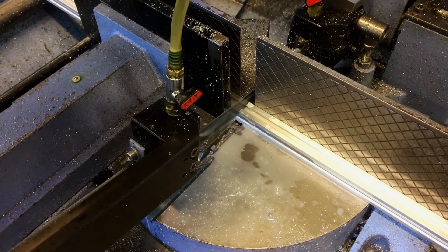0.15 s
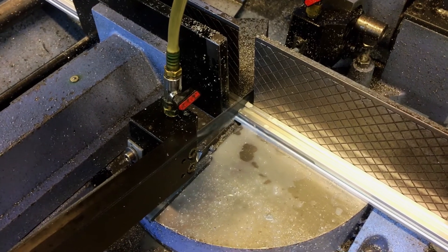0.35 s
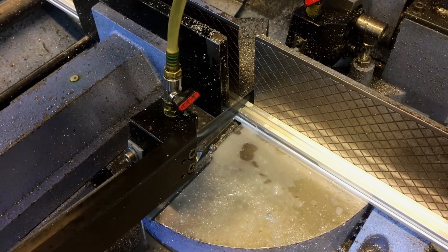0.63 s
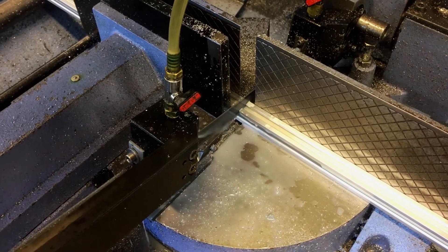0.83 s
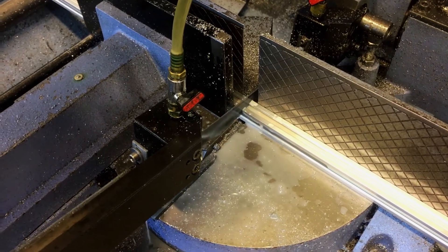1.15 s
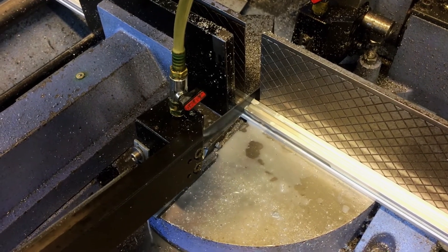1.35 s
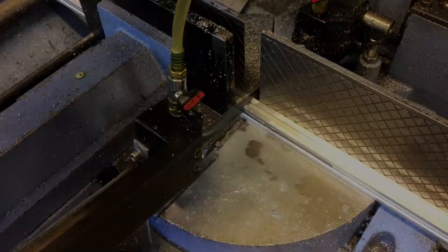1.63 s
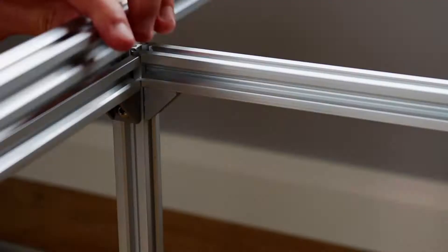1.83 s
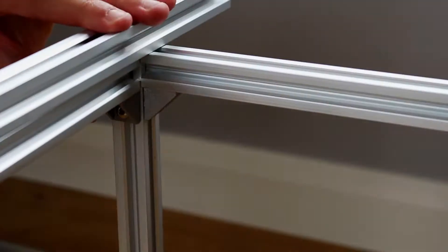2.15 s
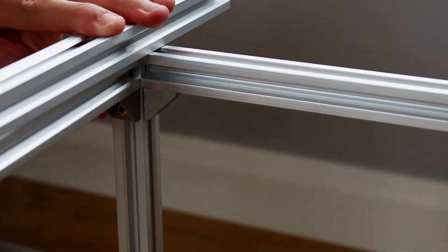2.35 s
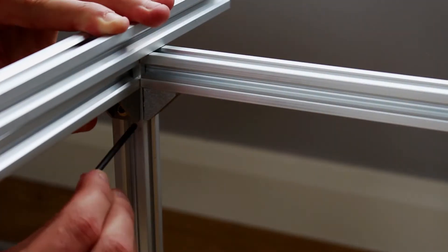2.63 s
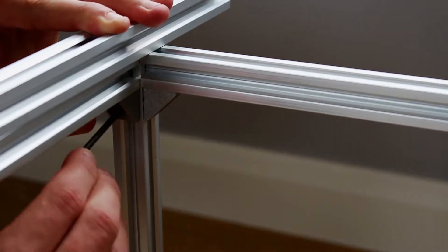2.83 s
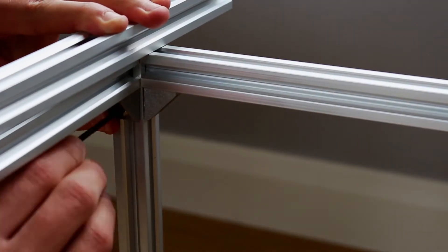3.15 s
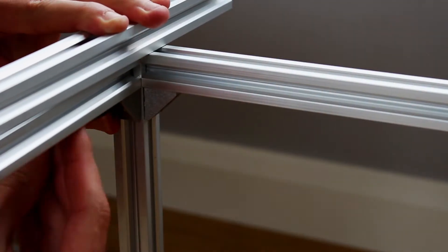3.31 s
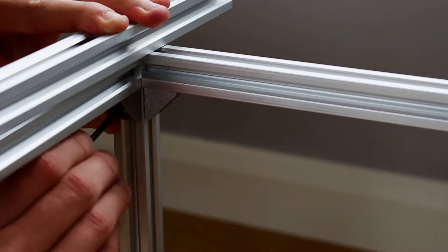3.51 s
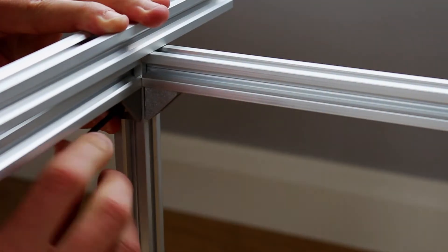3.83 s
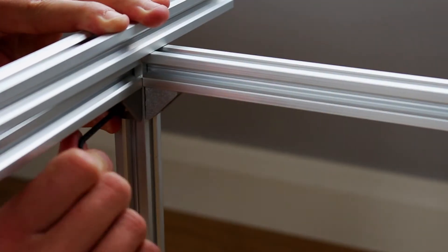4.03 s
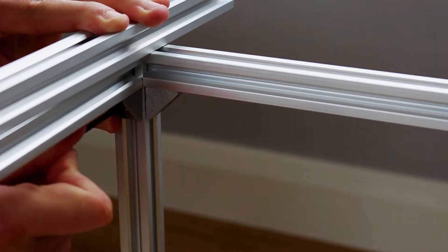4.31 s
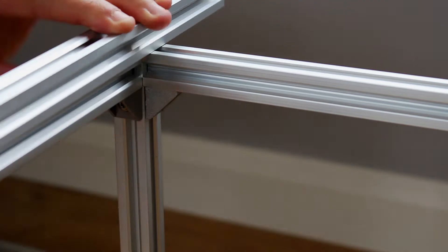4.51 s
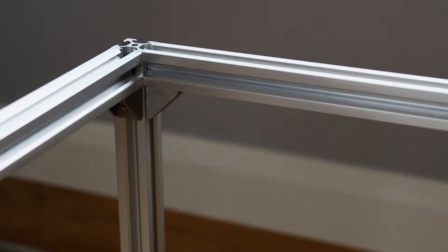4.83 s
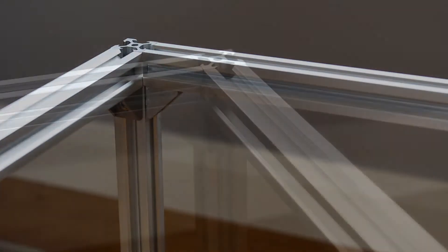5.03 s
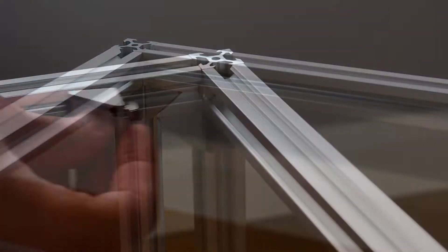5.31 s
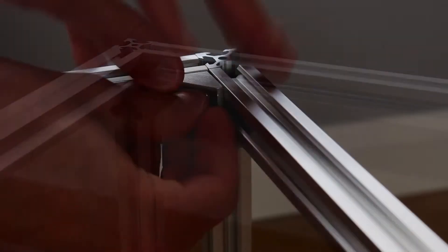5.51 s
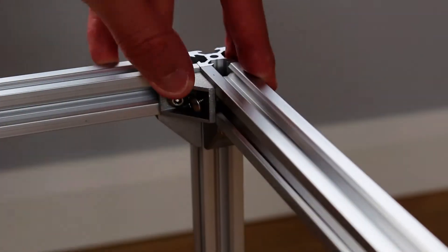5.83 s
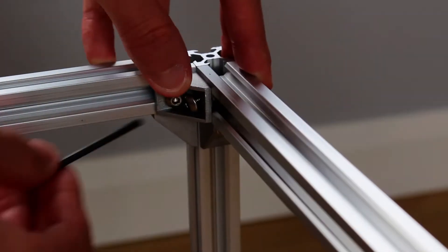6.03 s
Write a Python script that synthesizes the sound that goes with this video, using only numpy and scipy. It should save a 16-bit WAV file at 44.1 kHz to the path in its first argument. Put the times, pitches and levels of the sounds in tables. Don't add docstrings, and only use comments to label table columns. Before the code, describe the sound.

From 0 to about 1.75 seconds a circular saw cuts aluminium extrusion: a loud, dense tooth whine, strongest around 1.2 kHz, with gritty chip hiss, ringing blade, motor hum and slight fast pulsing; the bite roughens briefly near 1.45. It ends abruptly in a quiet room with faint air and low hum. At 2.0 and 2.1 bright metallic clacks seat a part on a hollow frame, with smaller taps to 2.4. From 2.7 to 3.45 a hex key gives small crisp ticks and scrapes, then near quiet until clicks at 4.35. At 4.6 a bar clatters sharply, then drags and knocks, with hard clacks at 4.8 to 5.0 and a hollow knock at 5.15. After a tiny silent gap at 5.26, brackets click, rattle and rub, with brief squeaks and dull knocks, until about 6.2. Close, dry, mono.

```python
import sys
import numpy as np
from scipy import signal
from scipy.fft import rfft, irfft
from scipy.io import wavfile
from scipy.ndimage import uniform_filter1d

SR = 44100
rng = np.random.default_rng(int(sys.argv[2]) if len(sys.argv) > 2 else 0)


def inscribe(sig):
    pcm = np.round(np.clip(np.atleast_2d(sig).T, -1, 1) * 32767)
    wavfile.write(sys.argv[1], SR, pcm.astype(np.int16))


def volts_from_decibels(level):
    exponent = np.asarray(level, float) / 20
    return 10 ** exponent


N = 272097
TIME = np.arange(N) / SR
HZ = np.fft.rfftfreq(N, 1 / SR) + 1

# f/Hz, level/dB, t60/s (same columns for the next six)
SEAT_MODES = [(2140, -4, 0.04), (3010, 5, 0.02), (3250, 8.5, 0.13), (3770, 4, 0.061), (4470, -3, 0.047),
              (5630, -6, 0.047), (6660, 1, 0.058), (6790, -1, 0.08), (7970, 0, .06), (8200, 7, 0.022),
              (8530, 1, 0.069), (9750, -3, .06), (10700, 2, 0.044), (11800, 2.5, 0.013)]
RESEAT_MODES = [(2214, -7, .04), (2690, 0, 0.013), (2930, -9, 0.045), (3250, -11, 0.03), (3820, -3, 0.036),
                (4480, -3, 0.023), (5330, -19, 0.03), (6105, -20, .07), (7860, 6, 0.017), (8220, 0, .04),
                (8600, -5, 0.05), (9600, -5, 0.046), (11120, 0, 0.012)]
KEY_MODES = [(1423, -5, 0.071), (2700, -6.5, 0.041), (3300, -11, .06), (3930, -14, 0.052),
             (4330, -16, 0.056), (4840, -22, 0.055), (6200, -15, .2), (6700, -8, 0.043), (7640, -4, 0.023),
             (8260, 3.5, 0.037), (9500, -4, .028), (11440, 2, 0.021), (13000, 0, 0.0017),
             (15700, -8, .0037)]
SLIP_MODES = [(2137, -20, .03), (3311, -11, .04), (3957, -10, .03), (4720, -14, .05), (5927, -15, .15),
              (6169, -15, .1), (7246, -7, .06), (8199, -1, .05), (9100, -2, .03), (9700, -2, .03),
              (11540, 0, .024), (13100, 2, .003)]
BAR_MODES = [(1810, -30, 0.54), (2226, 5.5, 0.024), (3260, 0, 0.045), (3680, 3.5, 0.021), (4350, -3, 0.12),
             (5968, -13, 0.26), (6770, -7, .04), (7300, -9, 0.12), (7850, 3, 0.13), (8130, 6, 0.032),
             (8850, 10, 0.0051), (9600, 3, 0.02), (11500, 1, 0.0043)]
DRAG_MODES = [(2620, 1, .02), (3090, 5, 0.013), (3500, -1, 0.074), (3790, -23, 0.033), (4300, -8, 0.059),
              (4920, -17, 0.036), (6900, -11, 0.037), (7730, -7, .03), (8400, -8, .02), (9560, -12, 0.012)]
KNOCK_MODES = [(1040, 11, 0.031), (1440, 10, 0.029), (1817, 8, 0.025), (2110, 3, 0.03), (2650, -8, 0.02),
               (3470, -6, 0.022), (4400, -10, 0.02), (8350, -3, 0.0095)]
# f/Hz, level/dB, t60/s
BRACKET_MODES = [(2200, -5, 0.0031), (2930, -9, 0.044), (3260, -16, 0.034), (3790, -12, .05),
                 (4700, -27, 0.045), (6400, -13, 0.1), (6800, -10, 0.033), (7700, -10, 0.065),
                 (8200, 4, 0.047), (9000, 5, 0.032), (9670, 7, 0.015), (10580, 1.5, 0.015),
                 (11500, -2, 0.022), (14100, 2, .001)]


def level(x, db):
    return x * volts_from_decibels(db) / np.sqrt(np.mean(x ** 2))


def curves(table):
    s, *columns = np.transpose(table)
    return [np.interp(TIME, s, c) for c in columns]


def noise(shape):
    white = rng.standard_normal(N)
    return level(irfft(rfft(white) * shape(HZ), N), 0)


def colour(table):
    hz, db = np.transpose(table)
    return lambda f: volts_from_decibels(np.interp(np.log(f), np.log(hz), db))


def peak(hz, width):
    return lambda f: 1 / (1 + (2 * (f - hz) / width) ** 2)


def band(low_hz, high_hz):
    return lambda f: 1 / np.sqrt((1 + (low_hz / f) ** 6) * (1 + (f / high_hz) ** 6))


def walk(rate):
    k = int(SR / rate)
    held = np.repeat(rng.standard_normal(N // k + 1), k)
    return 2.08 * uniform_filter1d(uniform_filter1d(held, k), k)[:N]


def resonances(table, flicker_db):
    return sum(volts_from_decibels(db + flicker_db * walk(5.3)) * noise(peak(hz, width)) for hz, width, db in table)


def room():
    # f/Hz, level/dB per Hz; then its overall level/dB
    air, air_db = [(24, -66), (40, -36), (101, -40), (127, -5), (155, -20), (194, 23), (320, -11),
                   (503, 21.5), (1210, -19), (1370, 23.5), (1680, -3), (12800, -23), (16000, 9)], -64
    # f/Hz, width/Hz, level/dB
    appliance = [(102.5, 7.7, -86), (114.7, 8.8, -80.5), (203, 7.4, -90), (251.5, 29, -75)]
    return level(noise(colour(air)), air_db) + resonances(appliance, 0.82)


def hands():
    # middle t/s, half length/s, level/dB, weight of the rubbed body/dB
    spells = [(1.814, 0.6, -61, -2), (1.912, 0.04, -72, 11), (2.496, 0.029, -63, 7),
              (2.614, 0.055, -65.5, 6.5), (2.993, 0.2, -71, 8.5), (4.655, 0.11, -53.5, -6.5),
              (4.948, 0.085, -42.5, -11), (5.157, 0.13, -52.5, 1), (5.408, 0.046, -56, -23),
              (5.617, 0.15, -58, 0), (5.864, 0.064, -52, -1), (6.012, 0.04, -62, 5.5),
              (6.17, 0.085, -51.5, -4)]
    # start t/s, length/s, level/dB
    squeaks = [(5.104, 0.13, -53.5), (5.278, .02, -48), (5.804, 0.079, -53), (5.98, .06, -57)]
    rest_db, squeak_edge_s = -61, 0.014
    skin = body = squeak = 0
    for s, half_s, db, weight_db in spells:
        stroke = volts_from_decibels(db) * np.exp(-((TIME - s) / half_s) ** 2)
        skin = skin + stroke
        body = body + stroke * volts_from_decibels(weight_db)
    for s, length_s, db in squeaks:
        inside_s = np.minimum(TIME - s, s + length_s - TIME)
        squeak = squeak + volts_from_decibels(db) * np.clip(inside_s / squeak_edge_s + .5, 0, 1) ** 2

    low = np.hypot(volts_from_decibels(rest_db + 0.6 + .9 * walk(27.12)), body * volts_from_decibels(-3.5 + 2.8 * walk(27)))
    middle = np.hypot(volts_from_decibels(rest_db - 1.5), body * volts_from_decibels(3.1 * walk(44)))
    treble = np.hypot(volts_from_decibels(rest_db + 1.2), skin * volts_from_decibels(3.8 * walk(45)))
    friction = low * noise(band(505.0, 1110.0))
    friction += middle * noise(band(1870.0, 2270.0))
    friction += treble * noise(band(3000.0, 12100.0))
    return friction + squeak * volts_from_decibels(2.2 * walk(60)) * noise(peak(7600, 450))


def thuds():
    # t/s, peak level/dB, f/Hz
    blows = [(4.628, -46, 244), (5.505, -44, 246), (5.561, -46, 239), (5.882, -47, 304), (1.899, -64, 104),
             (3.648, -65.5, 91.5), (4.599, -71, 147), (4.787, -54, 116), (4.79, -51, 237),
             (5.885, -58, 141), (5.021, -48, 118), (5.152, -51, 114), (2.117, -32, 534), (5.147, -26, 734),
             (5.661, -37, 620), (5.734, -39, 638), (5.788, -38.5, 607), (5.85, -36.5, 598),
             (5.931, -38, 596)]
    out = 0
    for s, peak_db, hz in blows:
        t = np.maximum(TIME - s, 0)
        fade_s = 0.0045 + 2.3 / hz
        swell = np.tanh(t / fade_s * 4.0)
        out = out + volts_from_decibels(peak_db) * swell * np.exp(-t / fade_s) * np.sin(2 * np.pi * hz * t)
    return out


def rings():
    # t/s, peak level/dB, f/Hz, t60/s
    tails = [(1.99, -33, 3780, .08), (1.992, -31, 3300, .14), (1.979, -33, 5700, .07),
             (2.106, -35, 4460, .05), (2.157, -46, 3300, .06), (2.319, -36, 2648, .04),
             (2.953, -47, 1442, .06), (2.998, -56, 5937, .3), (3.042, -44, 4440, .06),
             (4.645, -49, 1816, .7), (4.61, -30, 4460, .13), (4.63, -33, 5960, .34), (4.89, -36, 1534, .05),
             (4.956, -35, 581, .1), (4.995, -43, 565, .12), (5.02, -52, 560, 1.3), (5.056, -28, 7975, .06),
             (5.119, -39, 1055, .04), (5.145, -34, 554, .09), (5.329, -47, 3388, .05),
             (5.33, -59, 2140, .6), (5.451, -32, 4777, .06), (5.486, -47, 2400, .08),
             (5.658, -47, 5081, .055), (5.659, -37, 1464, .05), (5.734, -42, 1450, .04),
             (5.888, -40, 2750, .05), (6.1, -54, 2000, .25), (4.625, -34, 7800, .2), (4.63, -36, 7300, .13),
             (2.843, -46, 1300, .05), (3.437, -45, 1300, .05), (2.108, -33, 7800, .09),
             (1.979, -32, 4470, .08), (4.611, -30, 2900, .04)]
    waver_db, waver_rad, waver_per_s = 2, .45, 60
    out = 0
    for s, peak_db, hz, t60 in tails:
        t = np.maximum(TIME - s, 0)
        fade_db = peak_db - 60 * t / t60 + waver_db * walk(waver_per_s)
        tone = np.sin(2 * np.pi * hz * t + waver_rad * walk(waver_per_s))
        out = out + volts_from_decibels(fade_db) * np.tanh(t / 0.0029) * tone
    return out


def ticks():
    # t/s, peak level/dB, f/Hz
    impacts = [(1.9916, -13, 8200), (4.7622, -20, 4200), (4.8225, -12, 6500), (4.8304, -14, 5000),
               (4.8682, -21, 4000), (4.9211, -13, 2400), (4.9218, -6, 2000), (4.924, -13, 1700),
               (4.9585, -13, 4000), (5.0, -18, 2400), (5.0504, -31, 2200), (5.0596, -20, 5000),
               (5.4439, -24, 8700), (5.4512, -18, 8300), (5.5941, -19, 8400), (5.8903, -22, 6000)]
    out = 0
    for s, peak_db, hz in impacts:
        cycles = (TIME - s) * hz
        out = out + volts_from_decibels(peak_db) * np.exp(-(cycles / .65) ** 2) * np.sin(2 * np.pi * cycles)
    return out


def contacts(events, swell):
    # until t/s, its modes, ring over rattle/dB
    handled = [(2.09, SEAT_MODES, 5), (2.68, RESEAT_MODES, 7), (3.19, KEY_MODES, 4), (3.35, SLIP_MODES, 2),
               (4.5, SLIP_MODES, 1), (4.7, BAR_MODES, 5.5), (4.9, DRAG_MODES, -2), (5.27, KNOCK_MODES, 1),
               (5.56, BRACKET_MODES, 8), (5.8, BRACKET_MODES, 6), (5.95, BRACKET_MODES, 2),
               (6.2, BRACKET_MODES, 8)]
    crispness = [5, 5.5, 3.5, -0.5, 9.5, 4.5, 7.5, 1.5, 2, 10, 15.5, 2]
    # f/Hz, level/dB, t60/s
    hollow = [(534, 7, 0.051), (654, 7, 0.046), (935, 0, 0.04)]
    size = 2 ** 14
    t = np.arange(size) / SR
    f = np.fft.rfftfreq(size, 1 / SR) + 1
    parts = [band(5000., 18000.)(f), band(1600., 4800.)(f), band(430., 1150.)(f)]
    out = np.zeros(N + size)
    for s, peak_db, middle_db, low_db, length_s in events:
        modes, ring_db, crisp_db = next((*step[1:], db) for step, db in zip(handled, crispness) if s < step[0])
        hz, db, t60 = np.transpose(modes + hollow)[:, :, None]

        grip = rng.standard_normal((2, len(hz), 1))
        shifted_hz = hz * (1 + .001 * grip[0] / np.sqrt(t60))
        pole = np.exp(2j * np.pi * shifted_hz / SR - np.log(1000) / (np.clip(t60, .002, .4) * SR))
        favour = volts_from_decibels(db + 1.6 * grip[1]) * np.sqrt(1 - abs(pole))
        ring = np.sum(favour / (1 - pole * np.exp(-2j * np.pi * f / SR)), axis=0)

        lead_s = 2 * length_s * swell
        side_s = np.where(t < lead_s, 0.69 * length_s, length_s)
        shape = np.minimum(t / 0.00079, 1) * np.exp(-(abs(t - lead_s) / side_s) ** 1.56)
        shape *= 1 + (1 - swell) * np.exp(-t / 0.0013)
        chance = rng.standard_normal((2, size))
        rattle = rfft(shape * chance[0] * volts_from_decibels(0.31 * chance[1]))
        rattle = rattle * volts_from_decibels(crisp_db / (1 + (11500 / f) ** 12))

        for part, gain_db, extra_db in zip(parts, (-9.0, middle_db, low_db), (0, 1.5, 2.5)):
            ring_rms = np.sqrt(np.mean(abs(part * ring) ** 2) / np.mean(part ** 2))
            body = part * (1 + volts_from_decibels(ring_db + extra_db) * ring / ring_rms)
            sound = irfft(rattle * body, size)
            loudest = np.sqrt(uniform_filter1d(sound ** 2, size=256).max())
            out[int((s - lead_s) * SR):][:size] += volts_from_decibels(peak_db + gain_db) * sound / loudest
    return out[:N]


def handling():
    # t/s, peak level/dB, weight of the body under the tick/dB, length/s
    seating = [(1.977, -13.5, -15.5, 0.019), (1.9901, -11, -14.5, 0.02), (2.1052, -15, -17, 0.017),
               (2.158, -35.5, -19, 0.017), (2.215, -46.5, -7, 0.013), (2.285, -43.5, -7, 0.023),
               (2.32, -33, -9, 0.011)]
    key_turns = [(2.71, -41, -32, .014), (2.732, -30.5, -34, 0.016), (2.793, -24.5, -51, 0.034),
                 (2.81, -32.5, -19, 0.058), (2.902, -28.5, -32, 0.013), (2.9122, -21, -21, 0.014),
                 (2.998, -28.5, -27, 0.015), (3.0328, -45.5, -5, 0.012), (3.057, -50, -2.5, 0.035),
                 (3.1415, -24, -25, 0.014), (3.2086, -36, -14, 0.016), (3.2218, -17.5, -17, 0.017),
                 (3.2521, -31.5, -12, 0.025), (3.435, -34.5, -11, 0.019), (3.642, -67, 14.5, 0.03),
                 (4.3635, -30, -23, 0.0056), (4.446, -39.5, -14, 0.02)]
    bar_clatter = [(4.5454, -19.5, -11.5, 0.023), (4.576, -31.5, -5, 0.013), (4.59, -18.5, -10, 0.013),
                   (4.717, -36, -16, 0.01), (4.7615, -17, -18, 0.014), (4.821, -13.5, -21.5, 0.049),
                   (4.8435, -23, -19, 0.026), (4.8674, -16.5, -18, 0.013), (4.9209, -21, -2, 0.015),
                   (4.9284, -28.5, 6, 0.032), (4.955, -12.5, -18, 0.011), (5.001, -37, -1.5, 0.019),
                   (5.047, -34.5, -6, 0.025), (5.06, -23.5, -18.5, 0.012), (5.116, -35, -23, 0.018),
                   (5.232, -44, -12, 0.047)]
    bracket_fit = [(5.308, -40, -34, .025), (5.3193, -27, -29, 0.024), (5.354, -36.5, -18, 0.033),
                   (5.3757, -37.5, -34, 0.059), (5.44, -23, -43, .013), (5.45, -17, -30, 0.014),
                   (5.4967, -28, -14, 0.015), (5.5144, -29.5, -41, .022), (5.5839, -28.5, -15.5, 0.027),
                   (5.592, -19.5, -27, 0.016), (5.66, -36.5, -1.5, 0.011), (6.049, -37, -32, .019),
                   (6.136, -34, -33, .018)]
    # t/s, peak level/dB, weight/dB
    slides = [(1.8844, -46, -14), (2.0295, -29.5, -7.5), (2.343, -38.5, -11), (2.8467, -41, -3),
              (3.404, -41.5, -11), (4.6099, -7, -17.5), (4.6359, -18, -18.5), (4.791, -33, -15),
              (4.8903, -43, -1), (5.1494, -37.5, -9), (5.395, -36, -26), (5.4873, -41.5, -4),
              (5.5344, -39, -32), (5.5674, -41, -36), (5.864, -26, -35), (5.8886, -19.5, -17),
              (5.9074, -27, -17), (6.158, -29, -31), (4.914, -36, -6)]
    # t/s, peak level/dB
    knuckles = [(1.9785, -46), (2.1169, -42), (2.276, -46.5), (2.331, -42.5), (2.385, -50.5), (2.945, -54),
                (3.1406, -49), (3.222, -43), (3.4351, -49), (3.643, -58), (4.335, -51.5), (4.9551, -40),
                (4.997, -42.5), (5.116, -50), (5.134, -41), (5.283, -51.5), (5.4974, -42), (5.555, -49),
                (5.659, -35.5), (5.723, -55), (5.735, -38.5), (6.0497, -49), (2.845, -53), (3.398, -56),
                (5.59, -50)]
    hollow_db, knock_tick_db = -28, -21
    sharp = [(s, db, weight_db, weight_db + hollow_db, length_s)
             for s, db, weight_db, length_s in seating + key_turns + bar_clatter + bracket_fit]
    swells = [(s, db, weight_db, weight_db + hollow_db, 0.013) for s, db, weight_db in slides]
    knocks = [(s, db + knock_tick_db, 5, -knock_tick_db, 0.016) for s, db in knuckles]
    return contacts(sharp, 0) + contacts(swells, 0.88) + contacts(knocks, 0)


def blade_turn():
    sag_hz = 6.5 * (1 - np.tanh((TIME - .062) / .008)) / 2
    return 2 * np.pi * np.cumsum(413.9 - sag_hz) / SR


def rim_runout():
    first_dip_s, depth_db, share_of_turn = 0.0923, -3.5, 0.046
    rim = ((TIME - first_dip_s) * 413.9 / 48 + .5) % 1 - .5
    return depth_db * np.exp(-(rim / share_of_turn) ** 2) * (1 + 0.3 * walk(10.9))


def tooth_whine(turn, runout_db, feed_db, orders_db):
    # t/s, level/dB
    grip = [(0.0, -15.5), (0.066, -23), (0.16, -21), (0.29, -26), (0.42, -20), (0.72, -24.5), (0.82, -24),
            (0.87, -37.5), (0.973, -21.5), (1.09, -32), (1.18, -25.5), (1.245, -30), (1.32, -21.5),
            (1.5, -37), (1.58, -19), (1.635, -36), (1.71, -17), (1.75, -35)]
    # multiple, level/dB
    weak_orders = [(1, -48), (2.2, -45), (2.4, -38.5), (2.8, -40.5), (3.2, -44), (3.8, -43), (4.4, -43),
                   (6.006, -41), (7, -45), (8, -47), (9, -45), (22.18, -45), (10, -50), (3.122, -38),
                   (4.124, -43), (5.124, -46), (5.255, -45), (8.13, -49)]
    third_db = -22 + curves(grip)[0] + 23 + .1 * (feed_db + 26)
    whine = 0
    for k, db in zip((3, 2, 4, 5), (third_db, *orders_db)):
        gain = volts_from_decibels(db + runout_db + .3 * walk(39.9))
        slip = 2 * np.pi * 1.2 * np.cumsum(walk(25.26)) / SR
        whine = whine + gain * np.cos(k * turn + k ** 2 + slip)
    for k, db in weak_orders:
        gain = volts_from_decibels(db + 1.1 * walk(3.7))
        whine = whine + gain * np.cos(k * turn + 7.9 * rng.random() + 0.29 * walk(15.2))
    return np.sqrt(2) * whine


def chip_cut(turn, runout_db, feed_db, fine_db, rasp_db):
    # f/Hz, level/dB per Hz
    chip_colour = [(18, -64), (30, -36.5), (199, -14.5), (245, -18), (295, -15.5), (345, -24.5), (684, -16),
                   (822, -4), (1100, -5), (1220, -12.5), (1350, -4.5), (1670, -1.5), (4910, -16),
                   (9220, -20), (16000, -20)]
    # f/Hz, width/Hz, level/dB
    blade_modes = [(1228, 66, -33.5), (2865, 180, -46.5), (3400, 310, -44.5), (4070, 440, -41.5),
                   (5510, 290, -44.5), (5970, 170, -60.5), (5990, 140, -47.5), (6710, 220, -46.5),
                   (7440, 140, -44), (9150, 840, -41.5), (10050, 160, -51), (11000, 180, -45.5),
                   (11940, 320, -47)]
    spurt = 1 + .26 * np.cos(turn - .6) + .15 * np.cos(turn / 5)
    chips = level(noise(colour(chip_colour)) * spurt, 1.88)
    sharp = noise(band(8100.0, 16000.0)) * spurt * volts_from_decibels(-16.5)
    blade = resonances(blade_modes, 1.0) * volts_from_decibels(28.0)
    flutter_db = .35 * walk(45)
    cut = volts_from_decibels(feed_db + runout_db + 2.5 + flutter_db) * (chips + sharp + blade)
    fine = signal.sosfilt(signal.butter(2, 3300, "high", fs=SR, output="sos"), cut)
    cut = cut + (volts_from_decibels(fine_db + 2) - 1) * fine
    rasp = irfft(rfft(cut) * band(2900, 5000)(HZ), N)
    return cut + (volts_from_decibels(rasp_db) - 1) * rasp


def saw():
    # t/s, level/dB, fineness/dB
    feed = [(0.0, -23, 1.5), (0.02, -28, -3), (0.13, -30, -2), (0.17, -25, -1.5), (0.19, -26, -1),
            (0.336, -26.5, -2), (0.52, -27, 1), (0.554, -28, -1), (0.628, -25.5, -0.5), (0.76, -27, 0),
            (0.88, -27, -1.5), (0.984, -25, -1.5), (1.03, -27.5, -3), (1.194, -26.5, -2.5),
            (1.42, -26, -1.5), (1.442, -20.5, -5), (1.46, -24.5, -2), (1.75, -27.5, -2)]
    # t/s, second/dB, fourth/dB, fifth/dB, rasp/dB
    walls = [(0.0, -34, -37, -30.5, 1.5), (.1, -34, -37, -28.5, 2), (.2, -28.5, -29, -26.5, -0.5),
             (.27, -44, -40, -32.5, -0.5), (.37, -30.5, -35, -39, 0), (.41, -27, -22.5, -31, 2.5),
             (.5, -28.5, -24.5, -26, 3), (.555, -34, -31, -30, 3), (.62, -27.5, -25.5, -32, 4.5),
             (.74, -34.5, -26, -37, 5), (.88, -37.5, -34, -36.5, 1), (1.05, -37, -26, -30.5, 0.5),
             (1.15, -45, -40, -32.5, -3), (1.28, -29.5, -28, -23.5, -1), (1.36, -31.5, -31, -36, -0.5),
             (1.45, -36.5, -41, -30, -2), (1.54, -28.5, -31, -27, -2), (1.75, -31, -30, -29, 3.5)]
    # f/Hz, width/Hz, level/dB
    plate = [(8380, 50, -49), (8560, 50, -51), (9190, 60, -47), (9415, 14, -56), (12900, 130, -50),
             (13500, 200, -49)]
    # f/Hz, width/Hz, level/dB
    motor = [(51.3, 18.5, -43.5), (95.6, 11, -54), (154, 14, -53.5), (199.4, 9, -45.5), (288.5, 110, -47),
             (294.9, 2.2, -45.5), (465.6, 10, -52.5)]
    turn, runout_db = blade_turn(), rim_runout()
    feed_db, fine_db = curves(feed)
    *orders_db, rasp_db = curves(walls)
    whine = tooth_whine(turn, runout_db, feed_db, orders_db)
    cut = chip_cut(turn, runout_db, feed_db, fine_db, rasp_db)
    return whine + cut + resonances(plate, 1.0) + resonances(motor, 0.61)


def scene():
    saw_end_s, gap_start_s, gap_end_s = 1.7568, 5.2608, 5.2760
    bench = room() + hands() + thuds() + rings() + ticks() + handling()
    outside_gap = (TIME < gap_start_s) | (TIME > gap_end_s)
    mix = saw() * (TIME < saw_end_s) + bench * (TIME >= saw_end_s) * outside_gap
    return np.tile(mix, (2, 1))


def low_pass(x):
    return signal.sosfilt(signal.butter(12, 16830, fs=SR, output="sos"), x)


def record(dry):
    cut = signal.sosfilt(signal.ellip(8, .2, 40, 15900, fs=SR, output="sos"), dry)
    cut = signal.sosfilt(signal.butter(3, 42, "high", fs=SR, output="sos"), cut)
    return low_pass(cut)


dry = scene()
out = record(dry)
inscribe(out)
```